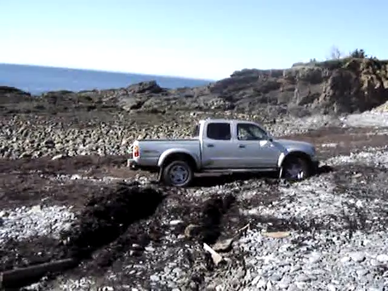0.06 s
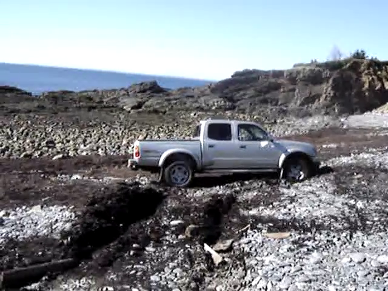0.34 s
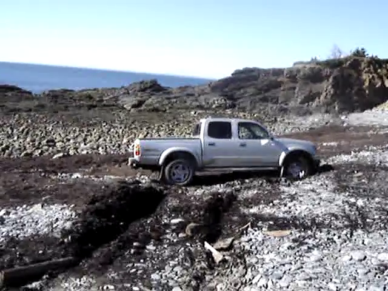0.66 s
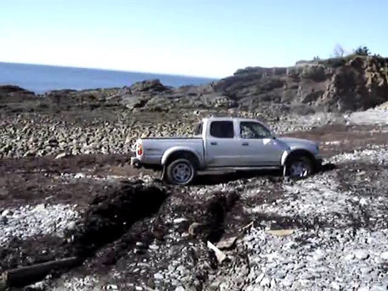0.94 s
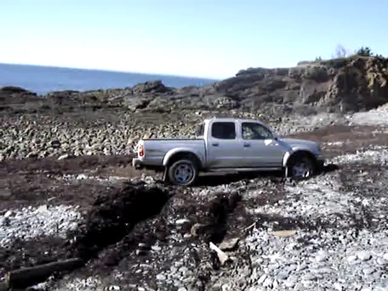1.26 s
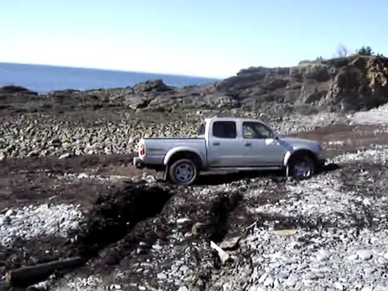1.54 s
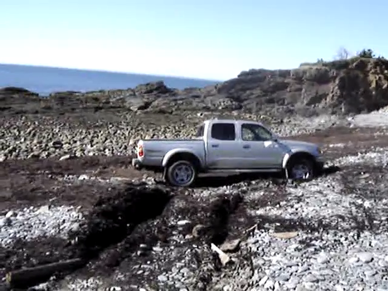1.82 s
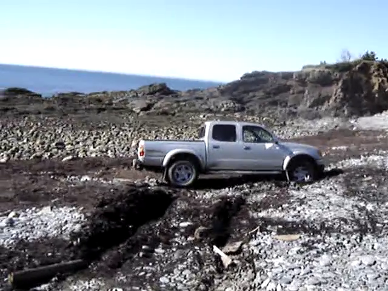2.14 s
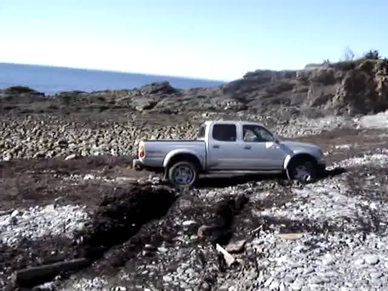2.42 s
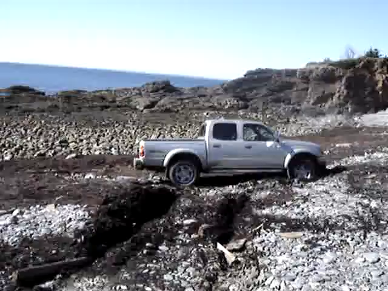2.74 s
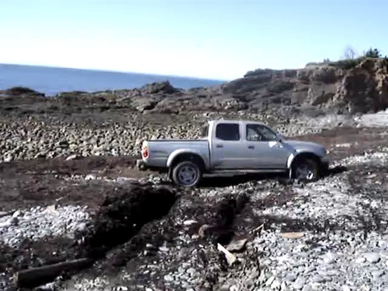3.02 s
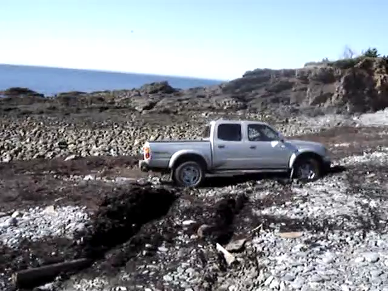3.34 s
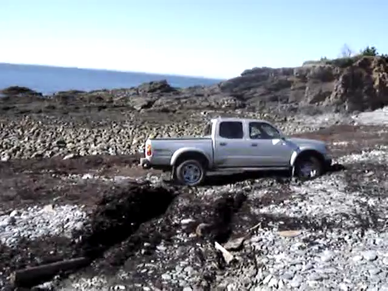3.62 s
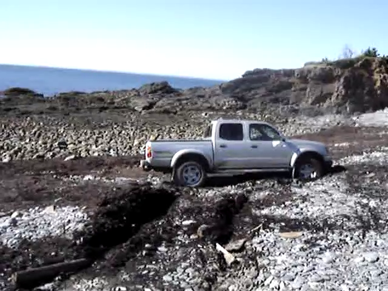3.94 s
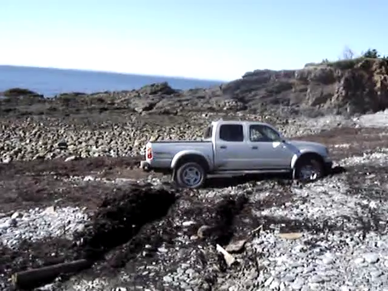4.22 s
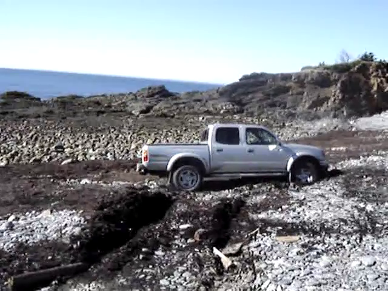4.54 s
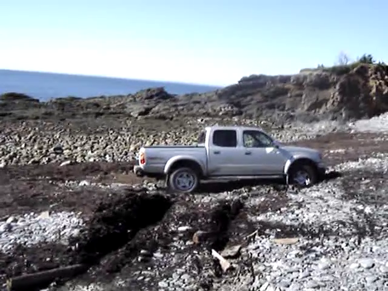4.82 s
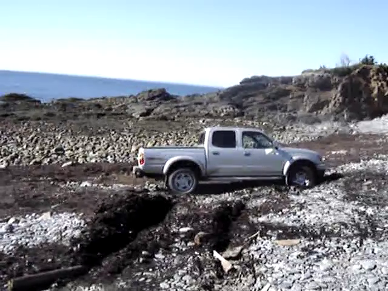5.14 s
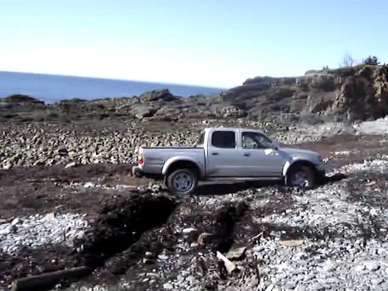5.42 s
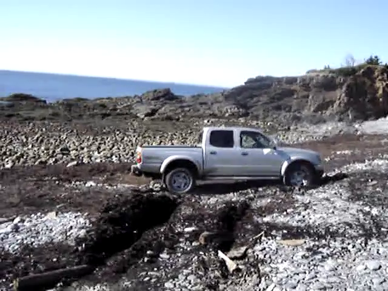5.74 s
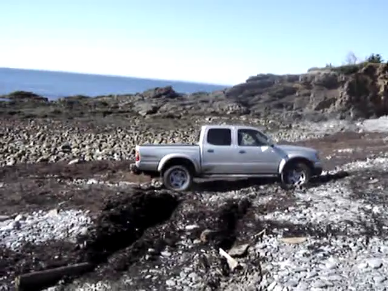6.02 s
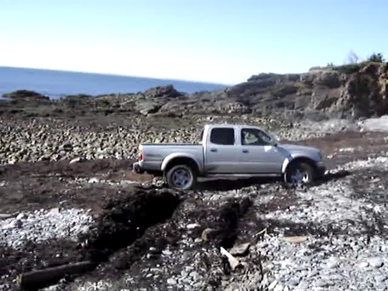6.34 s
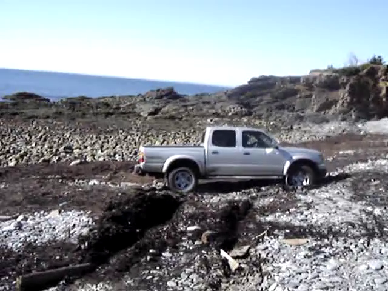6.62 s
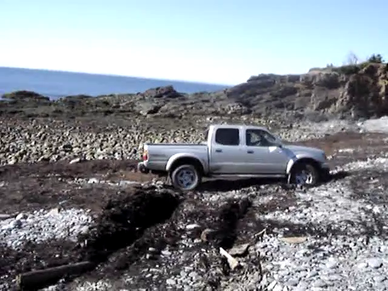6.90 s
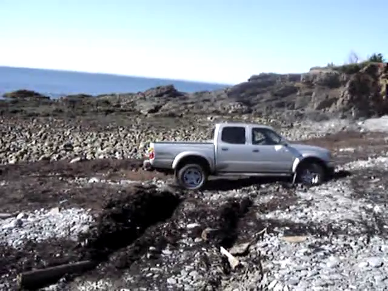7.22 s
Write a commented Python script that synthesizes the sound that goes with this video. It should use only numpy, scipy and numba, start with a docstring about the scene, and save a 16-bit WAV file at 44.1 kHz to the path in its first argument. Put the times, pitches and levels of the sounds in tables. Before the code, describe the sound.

A truck engine revs up and falls back again and again as wheels spin in mud and gravel, with stones clacking.

```python
"""On a muddy shingle shore, a stuck six-cylinder pickup rocks back and forth in five bursts of throttle.
Each time the revs climb, creep under load and coast back to idle. The firings boom in the exhaust
under load and burble off it; the engine bay whirrs with the revs and the belt squeaks faintly.
Spinning tyres roar and howl in their ruts, flinging grit and stones, and the suspension thuds.
The sea hisses far behind."""
import sys
import numpy as np
from scipy import signal
from scipy.fft import rfft, irfft
from scipy.io import wavfile
from scipy.ndimage import map_coordinates
from numba import njit

SR = 44100
rng = np.random.default_rng(int(sys.argv[2]) if len(sys.argv) > 2 else 0)


def wav_record(signal):
    """Record a signal, one row per channel, as 16-bit PCM in the file named by sys.argv[1]."""
    frames = np.transpose(np.atleast_2d(signal))
    bounded = np.clip(frames, -1, 1)
    # unit amplitude maps onto the largest positive 16-bit level
    quanta = np.round(bounded * 32767).astype(np.int16)
    wavfile.write(sys.argv[1], SR, quanta)


N = 320607
TIME = np.arange(N) / SR

# Table levels are relative: each layer adds its own trim.
# bursts of throttle: climb start t/s, pedal up t/s, pedal release/s, free climb/(Hz/s),
# top firing rate f/Hz, creep under load/(Hz/s), coast-down/s, exhaust level/dB
THROTTLE_BURSTS = [(-.6, .37, 0.075, 301.2, 149.3, 23.4, .49, -4.5),
                   (1.255, 2.11, .15, 270, 150, 14.5, .342, -0.5),
                   (2.931, 4.05, 0.32, 175, 125.2, 50.4, .41, -.5),
                   (4.525, 5.371, .36, 255.3, 144, 8.1, .53, 0),
                   (6.394, 7.316, 0.094, 150, 115.8, 42, 0.42, 0.5)]
# firing harmonics 1 to 3, the body of the boom: level under load/dB, drop off throttle/dB
BOOM_HARMONICS = [(1, 15), (-8.5, 15), (-21, 15)]
# standing waves in the exhaust that those harmonics sweep through: f/Hz, level/dB
BOOM_EQ = [(45, -36), (70, -37.5), (100, -29), (120, -27), (140, -18.5), (156, -18.5), (180, -10.5),
           (200, -17), (222, -13), (262, -17), (292, -13), (330, -4.5), (400, -34.5), (450, -23)]
# exhaust overtones surge as the tyres grip and sag as they slip: middle t/s, half length/s, level/dB
EXHAUST_LURCHES = [(1.42, 0.031, -1.5), (1.525, 0.11, -3), (3.079, 0.043, 1.5), (3.198, 0.059, -4.5),
                   (3.332, 0.079, 3.5), (3.51, 0.07, -7), (3.76, .11, 2.5), (4.612, 0.022, 12),
                   (4.726, 0.026, 4.5), (6.63, 0.047, -6), (6.77, .05, 3.5), (6.991, 0.065, 0.5),
                   (7.198, 0.08, 1)]
# partials from the unequal cylinders: multiple of the firing rate, level/dB
UNEVEN_PARTIALS = [(1 / 2, -9), (5 / 6, -24), (7 / 6, -13.5), (4 / 3, -15), (3 / 2, 1), (5 / 3, -4.5),
                   (5 / 2, 0.38), (7 / 2, 0.33), (4, -1)]
# tone the exhaust system gives those partials: f/Hz, level/dB
PIPE_EQ = [(25, -33), (55, -31), (100, -4.5), (170, 0.5), (230, -6.5), (330, -14.5), (400, -20), (520, -39),
           (900, -60), (2000, -43)]
# tone of one erratic firing at the tailpipe: f/Hz, level/dB
BURBLE_EQ = [(25, -20), (60, -6), (105, -3), (160, 4.5), (200, 3), (260, -7.5), (330, -9.5), (400, -17.5),
             (900, -44), (3000, -66)]
# engine bay resonances: f/Hz, width/Hz, level/dB
BAY_MODES = [(505, 15.7, 8), (720, 57, -1), (849.7, 8.9, 8), (1212, 140, -2), (1627, 28, 2.5),
             (3110, 460, -8.5), (3810, 33, -0.5), (4500, 370, -21), (5300, 180, -8.5), (5800, 250, -15.5),
             (6600, 230, -35)]
# partials of the intake note: multiple of the firing rate, level/dB
INTAKE_PARTIALS = [(3.5, -10.5), (4, 0.5), (4.5, -16), (5, -1.5), (6, 4), (7, 0), (7.5, -5), (8, -1.5),
                   (9, -3.5), (11, -5.5), (11.5, -5), (12, -11)]
# wheelspins: break loose t/s, full spin t/s, slowing t/s, run-down/s, roar level/dB, grit level/dB
WHEELSPINS = [(-.6, -.1, 0.72, 0.17, -21, -29.5), (1.135, 1.617, 1.97, 0.9, -39.5, -37),
              (2.062, 2.298, 2.396, 0.39, -28.5, -31.5), (2.91, 3.942, 4.33, 0.08, -19.5, -27.5),
              (4.45, 4.845, 4.56, 0.85, -26, -30.5), (5.25, 5.55, 5.85, .27, -29.5, -33.5),
              (6.33, 7.148, 7.42, 0.11, -21.5, -25)]
# tone of the tyre carcass and wheel well: f/Hz, level/dB
CARCASS_EQ = [(100, -62), (220, -9.5), (290, -2.5), (345, 3), (410, -11.5), (480, -6), (570, 1), (800, 2),
              (940, 2), (1050, -14), (1220, -8.5), (1400, -19.5), (1600, -7.5), (1900, -37)]
# a tyre bites into its rut: middle t/s, half length/s, howl f/Hz, howl level/dB, drumming level/dB
RUT_BITES = [(0.053, 0.51, 903, -24, -29.5), (0.345, 0.2, 807, -23, -37), (0.55, 0.12, 760, -16.5, -38),
             (0.675, 0.12, 659.4, -22, -32.5), (2.373, 0.2, 630, -31, -34),
             (3.594, 0.093, 620, -35.5, -28.5), (3.834, 0.17, 500, -29.5, -37),
             (4.052, 0.12, 722, -28, -23), (4.288, 0.11, 771.3, -29, -28), (5.706, .16, 597, -28.5, -28.5),
             (7.27, 0.21, 722.2, -28, -36)]
# tone of grit and wet mud: f/Hz, level/dB
GRIT_EQ = [(400, -24), (1100, -3), (1600, 2.5), (1900, -3), (2250, 0.5), (2700, -1.5), (3400, -2.5),
           (4000, -2), (5000, -4), (6300, -4), (8000, -8.5), (10000, -15)]
# stones knocking: t/s, clack level/dB, f/Hz, time to fade 60 dB/s, chips level/dB
STONE_HITS = [(0.616, -14.5, 1250, 0.0062, -25), (.863, -26, 3130, .025, -41),
              (1.113, -39, 5630, .022, -40), (1.257, -23.5, 1950, 0.028, -35),
              (1.272, -20.5, 1680, 0.022, -39), (1.288, -39, 5840, 0.17, -34.5),
              (2.213, -16, 2640, 0.042, -32), (2.341, -25, 8740, .018, -24), (2.356, -24, 6070, .022, -24),
              (2.477, -19, 2080, 0.052, -29), (2.481, -22, 3794, 0.023, -24),
              (2.534, -32, 5800, 0.059, -27), (2.654, -19, 1360, 0.022, -23),
              (2.658, -21, 1400, 0.038, -25.5), (2.664, -23.5, 3750, 0.046, -30),
              (2.89, -39, 3670, 0.16, -35.5), (3.028, -30.5, 1590, 0.041, -35),
              (4.538, -22.5, 1530, 0.049, -28.5), (5.639, -33, 5493, .025, -25),
              (6.054, -25, 5510, 0.026, -31.5), (6.278, -30, 3680, 0.058, -24)]
# body and tyres bumping in the ruts: t/s, level/dB, f/Hz
RUT_THUDS = [(0.729, -32, 85), (0.82, -25, 297), (1.62, -30, 85.2), (4.127, -29, 70), (4.43, -32, 65),
             (5.70, -17, 297)]
# thin squeaks of the drive belt: middle t/s, half length/s, f/Hz, level/dB
BELT_SQUEAKS = [(4.817, 0.22, 4660, -44.5), (6.502, 0.064, 4700, -49)]
# tone of distant surf: f/Hz, level/dB
SURF_EQ = [(30, -12), (70, 3), (200, 8.5), (400, 3.5), (650, 6), (1200, 3.5), (1600, 4), (3000, -2),
           (6000, -38), (10000, -28)]

IDLE_HZ, COAST_SHAPE = 40.92, 1.3  # firing rate at idle; curve of the fall back to it
LOAD_ATTACK_S, REV_LAG_S = .17, .05  # the load builds a moment before the revs move
WOBBLE_IDLE, WOBBLE_DRIVEN = .025, .005  # random unevenness, as shares of the revs
BURBLE_DB, BURBLE_DB_PER_OCT = -26, 5
OVERRUN_DB, OVERRUN_DB_PER_OCT = 1.5, 9  # off throttle the burble fades faster with the revs
ROLLING_ROAR_DB, ROLLING_GRIT_DB = -47.5, -48.5  # tyres creeping between spins
ROAR_POWER, GRIT_POWER = 2.1, 1.3  # roar and grit grow as powers of the slip
GRIT_DB_PER_OCT = 3  # faster revs fling more grit
HOWL_SAG_HZ_PER_S = 277  # the rut brakes the wheel


def throttle():
    """Firing rate, load and exhaust level: revs climb freely, creep as the drivetrain holds, then coast."""
    above_idle, load, effort_db = 0, 0, 0
    for down, up, release, climb, top_hz, creep, coast, db in THROTTLE_BURSTS:
        free = np.maximum(climb * (TIME - down), 1e-3)
        held = np.maximum(top_hz - IDLE_HZ + creep * np.minimum(TIME - up, 0), 1)
        driven = (free ** -8 + held ** -8) ** (-1 / 8)  # the lower of the two, with a soft knee
        coasting = np.exp(-(np.maximum(TIME - up, 0) / coast) ** COAST_SHAPE)
        above_idle = np.maximum(above_idle, driven * coasting)
        pressed = ramp(down - REV_LAG_S, LOAD_ATTACK_S)
        load = load + pressed * (1 - ramp(up, release))
        effort_db = effort_db + (db - effort_db) * pressed
    return IDLE_HZ + above_idle, load, effort_db


def exhaust_boom(hz, firings, load, effort_db, lurch_db):
    """Under load the first firing harmonics boom, swelling through the pipe's standing waves."""
    labour_db = 3.7 * np.maximum(np.log2(140 / hz), 0)  # more flutter as it labours at low revs
    boom = 0
    for k, (db, drop_db) in enumerate(BOOM_HARMONICS, 1):
        level_db = db + gain_db(k * hz, BOOM_EQ) + effort_db - drop_db * (1 - load) + (k > 1) * lurch_db
        flutter_db = (0.21 * k + labour_db) * walk(25)
        boom = boom + undb(level_db + flutter_db) * np.sin(2 * np.pi * k * firings)
    return np.sqrt(2) * boom


def exhaust_burble(hz, firings, load, effort_db, lurch_db):
    """Unequal cylinders and erratic firings burble in the pipe, dying down as the engine coasts to idle."""
    lumpy = 0
    for multiple, db in UNEVEN_PARTIALS:
        level_db = db + gain_db(multiple * hz, PIPE_EQ) + 2 * walk(14)
        lumpy = lumpy + undb(level_db) * np.sin(2 * np.pi * (multiple * firings + rng.random()))
    pulses = np.diff(np.floor(firings), prepend=0) > 0
    sputter = colour(pulses * rng.uniform(-1.06, 1, N) / np.sqrt(hz), BURBLE_EQ)
    sputter_db = -3 - 4.5 * np.log2(hz / 90)  # combustion steadies as the revs rise
    octaves = np.log2(hz / 140)
    overrun_db = (1 - load) * (OVERRUN_DB + OVERRUN_DB_PER_OCT * octaves)
    burble_db = BURBLE_DB + effort_db + .3 * lurch_db + BURBLE_DB_PER_OCT * octaves + overrun_db
    return undb(burble_db) * (lumpy + undb(sputter_db) * sputter)


def engine_bay(hz, firings, load):
    """Valve clatter and intake rush pulse with each firing and ring the panels, under the intake note."""
    cycle = rng.standard_normal(2048)
    clatter = cycle[(firings / 6 % 1 * len(cycle)).astype(int)]  # loops every six firings
    pulsing = 0.36 + np.exp(-(firings % 1) / 0.2)
    rush = (rng.standard_normal(N) + 0.17 * clatter) * pulsing
    whirr = unit(sum(undb(db) * ring(rush, f, width) for f, width, db in BAY_MODES))
    note = 0
    for multiple, db in INTAKE_PARTIALS:
        # each partial swells as it sweeps through a resonance
        power = sum(undb(2 * mode_db) / (1 + ((multiple * hz - f) / width) ** 2)
                    for f, width, mode_db in BAY_MODES[:5])
        gain = np.sqrt(power) * undb(db + 2 * walk(30))
        note = note + gain * np.sin(2 * np.pi * (multiple * firings + rng.random()))
    octaves = np.log2(hz / 145)
    note_db = -41.5 + 15.3 * octaves + 6.1 * load  # the open throttle lets the note out
    return undb(-36 + 9.9 * octaves) * whirr + undb(note_db) * unit(note)


def wheelspin(hz):
    """Level curves for roar and grit: each spin builds up and runs down."""
    roar, grit = undb(ROLLING_ROAR_DB), undb(ROLLING_GRIT_DB)
    fling_db = GRIT_DB_PER_OCT * np.log2(hz / 140)
    for loose, full, slow, run_down, roar_db, grit_db in WHEELSPINS:
        slip = ramp(loose, full - loose) * (1 - ramp(slow, run_down))
        roar = np.hypot(roar, undb(roar_db) * slip ** ROAR_POWER)
        grit = np.hypot(grit, undb(grit_db + fling_db) * slip ** GRIT_POWER)
    return 20 * np.log10(roar), 20 * np.log10(grit)


def tyres(roar_db):
    """Tread blocks slap through the ruts, drumming the tyre's air cavity and howling in the wheel wells."""
    slaps = impacts(rate=3500, spread_db=1) * undb(0.48 * walk(35))
    roar = colour(slaps, CARCASS_EQ)
    cavity = ring(impacts(rate=1200, spread_db=3), hz=274.5, width=75)
    hollow = unit(ring(cavity, hz=315, width=85))
    howl, drumming = 0, undb(roar_db - 10)
    for middle, half_length, hz, howl_db, drumming_db in RUT_BITES:
        bite = swell(middle, half_length)
        howl_hz = hz - HOWL_SAG_HZ_PER_S * np.clip(TIME - middle, -.5, .5)
        tread = impacts(rate=1700, spread_db=2.5)
        tone = unit(swept_band(swept_band(tread, howl_hz, 105.), howl_hz, 180.))
        howl = howl + undb(howl_db) * bite * tone
        drumming = np.hypot(drumming, undb(drumming_db) * bite)
    return undb(roar_db - 1.5) * roar + howl + drumming * hollow


def grit_spray(grit_db):
    """Coarse to fine grit patters on body and shingle, denser as more is thrown, over a hiss of mud."""
    rate = 1400 * undb(.5 * (grit_db + 36))  # grains a second in each band
    t = TIME[:SR // 100]
    patter = 0
    for hz, width in [(1650, 2100), (2800, 2400), (5000, 360), (8000, 10300)]:
        clicks = impacts(rate=rate, spread_db=2.5) / np.sqrt(rate / rate.mean())
        crunch = rng.standard_normal(len(t)) * undb(-60 * t / 0.0078)
        grains = unit(signal.fftconvolve(clicks, crunch)[:N])
        clumps = undb(1.53 * walk(28))  # grit leaves the tread in clumps
        patter = patter + clumps * ring(grains, hz, width)
    mud = rng.standard_normal(N)
    spray = colour(undb(-3.5) * unit(patter) + undb(-5.5) * mud, GRIT_EQ)
    return undb(grit_db + 0.98 * walk(35)) * spray


def stones():
    """Each stone clacks with a cluster of close modes, and its chips chatter as it fades."""
    out = np.zeros(N + SR)
    t = TIME[:SR // 5]
    attack = np.minimum(t / 0.0005, 1)  # mud cushions the first touch
    for at, db, hz, t60, chips_db in STONE_HITS:
        mode_hz = hz * rng.uniform(0.95, 1.4, size=(4, 1))
        cluster = np.sin(2 * np.pi * (mode_hz * t + rng.random(size=(4, 1)))).sum(axis=0)
        clack = .5 * np.sin(2 * np.pi * hz * t) + 0.28 * cluster
        chatter = np.repeat(rng.uniform(.4, 1, len(t)), 64)[:len(t)]
        chips = ring(rng.standard_normal(len(t)) * chatter, hz=4000, width=4000)
        hit = undb(db) * clack + undb(chips_db + 8) * chips
        start = int(at * SR)
        out[start:start + len(t)] += hit * attack * undb(-60 * t / t60)
    return out[:N]


def thuds():
    """Dull, well damped bumps of the suspension."""
    out = 0
    for at, db, hz in RUT_THUDS:
        t = np.maximum(TIME - at, 0)
        envelope = t / 0.0045 * np.exp(1 - t / 0.007)
        out = out + undb(db) * envelope * np.sin(2 * np.pi * hz * t)
    return out


def belt():
    """The drive belt slips in brief, faint squeaks as the revs pick up."""
    out = 0
    for middle, half_length, hz, db in BELT_SQUEAKS:
        squeak = ring(ring(rng.standard_normal(N), hz, width=90), hz, width=130)
        out = out + undb(db) * swell(middle, half_length) * unit(squeak)
    return out


def shore_reverb(x):
    """Rocks and the bluff scatter a thin, short tail behind the direct sound."""
    t = TIME[:SR // 2]
    scatter = ring(rng.standard_normal(len(t)), hz=1300, width=2800)
    tail = scatter * undb(-60 * t / 0.47) * (t > .008)
    return x + undb(-16) * signal.fftconvolve(x, tail / np.sqrt(np.sum(tail ** 2)))[:N]


def sea():
    """Distant surf: a soft bed of noise whose level drifts gently."""
    return undb(-48 + walk(1.5)) * colour(rng.standard_normal(N), SURF_EQ)


def undb(db):
    """Decibels to gain."""
    return 10 ** (np.asarray(db) / 20)


def unit(x):
    """Scale to an rms of 1."""
    return x / np.sqrt(np.mean(x ** 2))


def gain_db(hz, eq):
    """Read an EQ curve of (f/Hz, level/dB) points."""
    at_hz, db = np.transpose(eq)
    return np.interp(np.log(hz), np.log(at_hz), db)


def colour(x, eq):
    """Shape with a minimum-phase EQ and scale to an rms of 1."""
    size = 8192
    log_gain = np.log(undb(gain_db(np.fft.rfftfreq(size, 1 / SR) + 1, eq)))
    cepstrum = irfft(log_gain)
    cepstrum[1:size // 2] *= 2
    cepstrum[size // 2 + 1:] = 0
    impulse = irfft(np.exp(rfft(cepstrum)))
    return unit(signal.fftconvolve(x, impulse)[:N])


@njit
def swept_band(x, hz, width):
    """Band-pass whose centre may move; width in Hz."""
    y, band, low = np.empty(len(x)), 0., 0.
    for i in range(len(x)):
        g, damping = np.tan(np.pi * hz[i] / SR), width / hz[i]
        v = (band + g * (x[i] - low)) / (1 + g * (g + damping))
        band, low, y[i] = 2 * v - band, low + 2 * g * v, damping * v
    return y


def ring(x, hz, width):
    """Steady resonance, gain 1 at its centre; width in Hz."""
    return signal.lfilter(*signal.iirpeak(hz, hz / width, fs=SR), x)


def walk(rate):
    """Smooth random drift through `rate` points a second, with a spread near 1."""
    knots = rng.standard_normal(4096)
    return map_coordinates(knots, [TIME * rate], order=2, mode="wrap")


def impacts(rate, spread_db):
    """About `rate` random clicks a second, mostly small and a few large."""
    hit = rng.random(N) < rate / SR
    size = undb(spread_db * np.minimum(rng.exponential(size=N), 4))
    return unit(hit * size * rng.choice([-1, 1], N))


def ramp(start, length):
    """Rise from 0 to 1 over `length` seconds."""
    return np.clip((TIME - start) / length, 0, 1)


def swell(middle, half_length):
    """Bell-shaped rise and fall."""
    return np.exp(-((TIME - middle) / half_length) ** 2)


def scene():
    """Mono mix: the engine dry and up front, tyres and debris in a short reverb, the sea behind."""
    hz, load, effort_db = throttle()
    roar_db, grit_db = wheelspin(hz)
    wobble = WOBBLE_DRIVEN * load + WOBBLE_IDLE * (1 - load)
    firings = np.cumsum(hz * (1 + wobble * walk(30))) / SR  # running count: the engine's phase
    lurch_db = sum(db * swell(middle, half_length) for middle, half_length, db in EXHAUST_LURCHES)
    boom = exhaust_boom(hz, firings, load, effort_db, lurch_db)
    burble = exhaust_burble(hz, firings, load, effort_db, lurch_db)
    truck = boom + burble + engine_bay(hz, firings, load) + belt()
    ground = tyres(roar_db) + grit_spray(grit_db) + stones() + thuds()
    return (truck + shore_reverb(ground) + sea())[None]


def record(dry):
    """A steep high cut takes the air off the whole mix."""
    high_cut = signal.ellip(10, .2, 75, 10120, fs=SR, output="sos")
    return signal.sosfilt(high_cut, dry)


dry = scene()
out = record(dry)
wav_record(out)
```